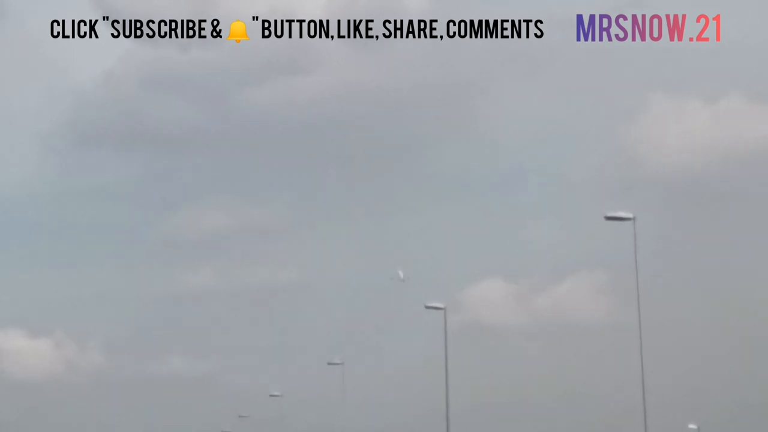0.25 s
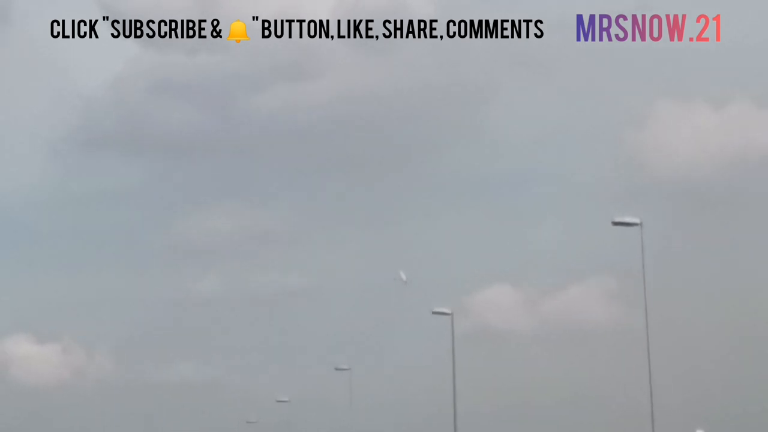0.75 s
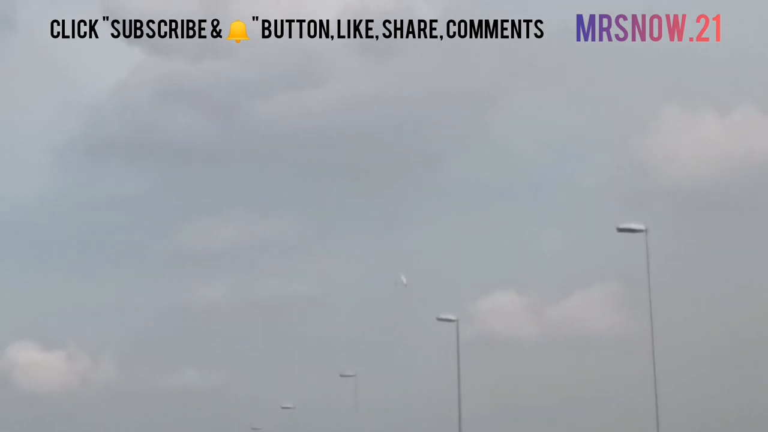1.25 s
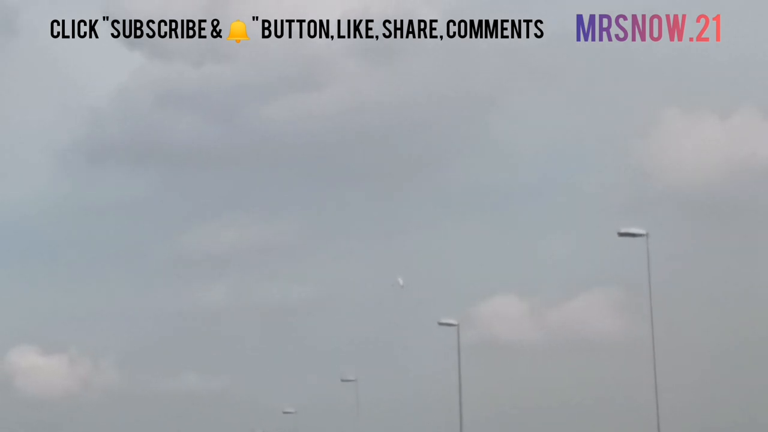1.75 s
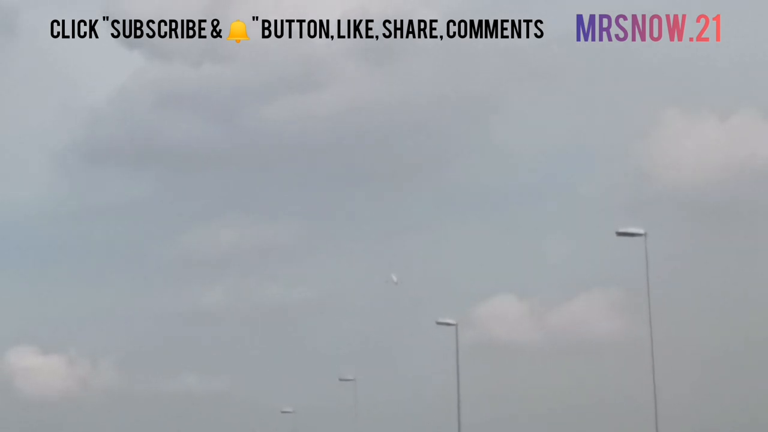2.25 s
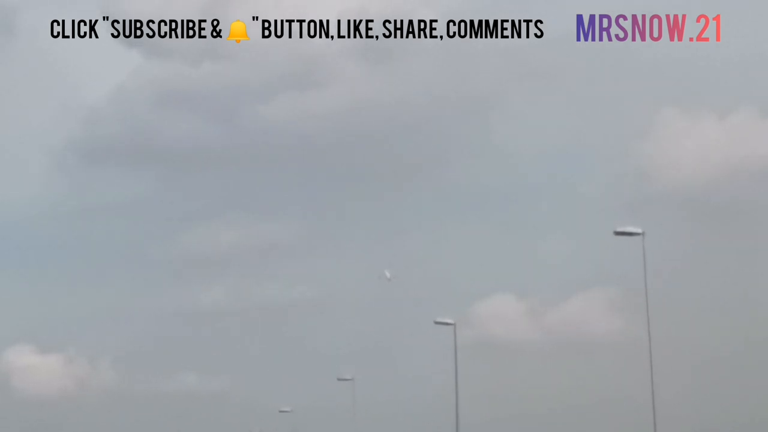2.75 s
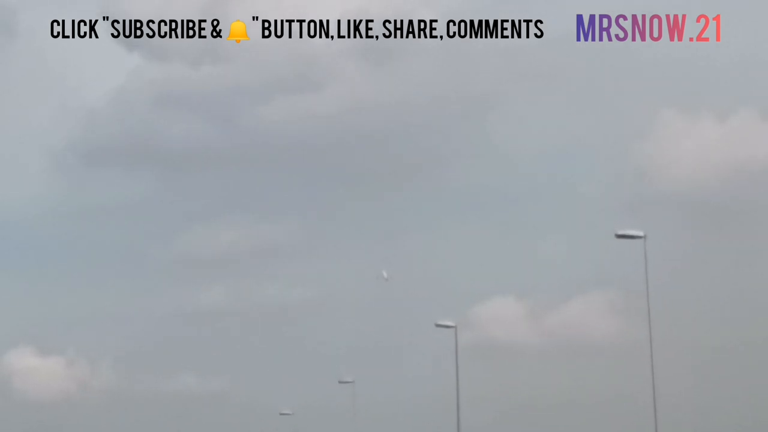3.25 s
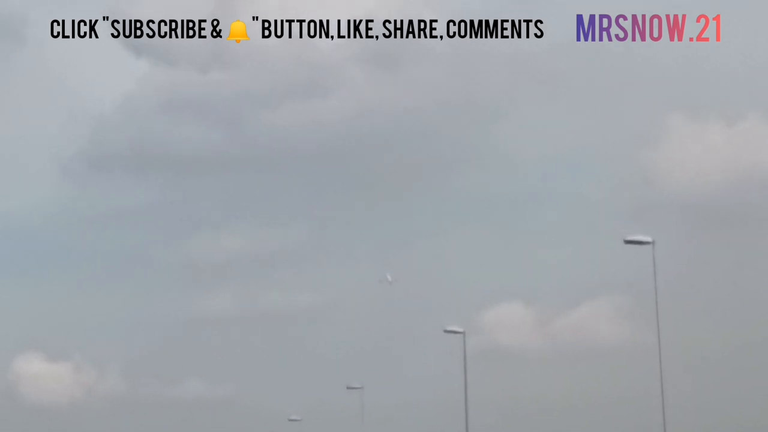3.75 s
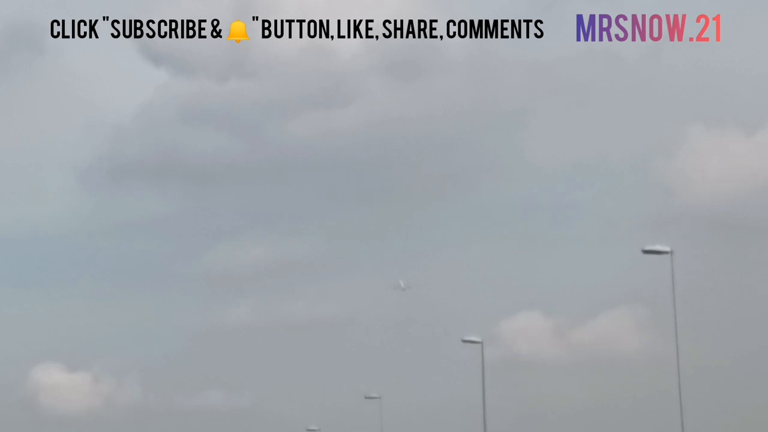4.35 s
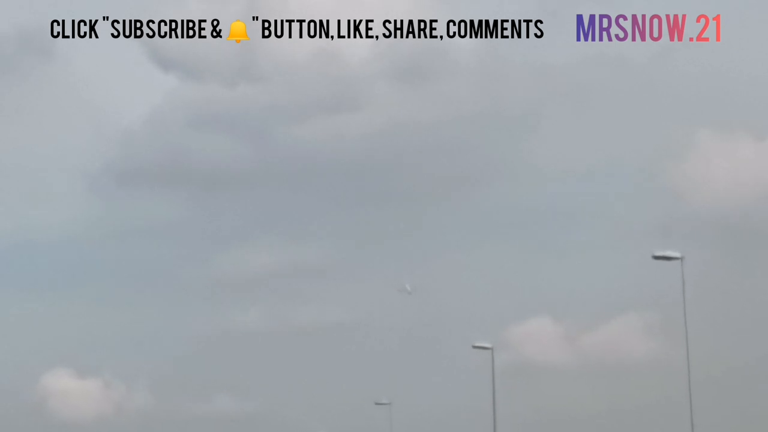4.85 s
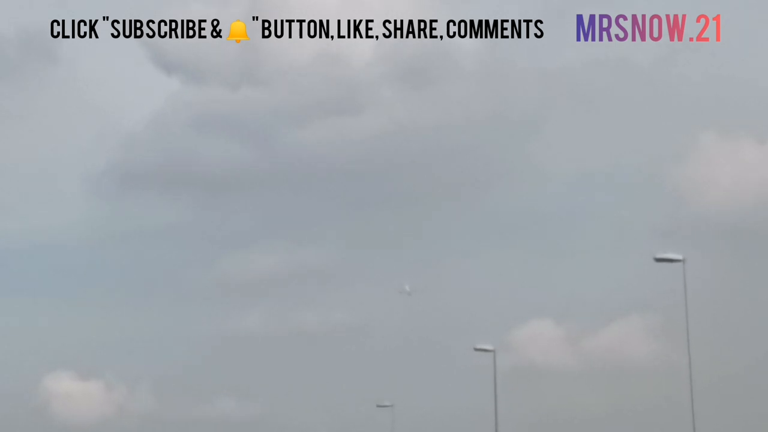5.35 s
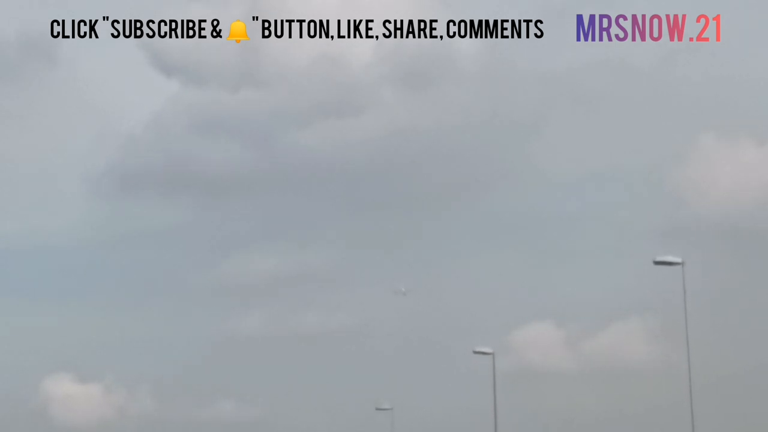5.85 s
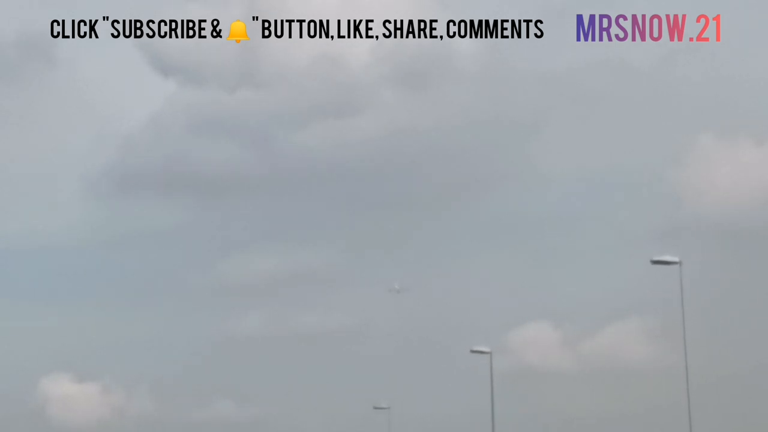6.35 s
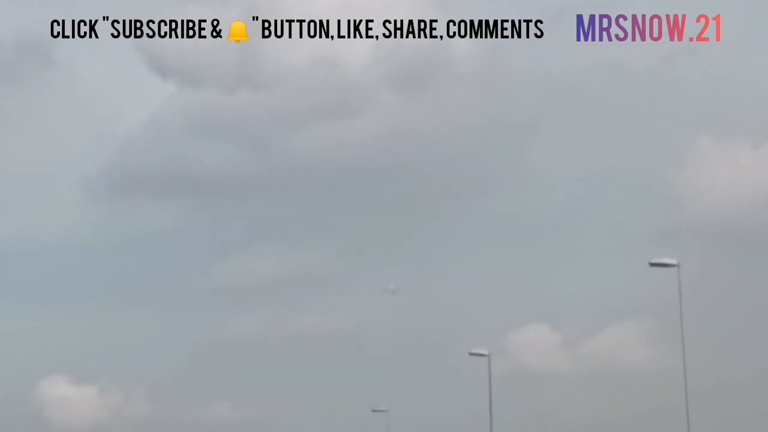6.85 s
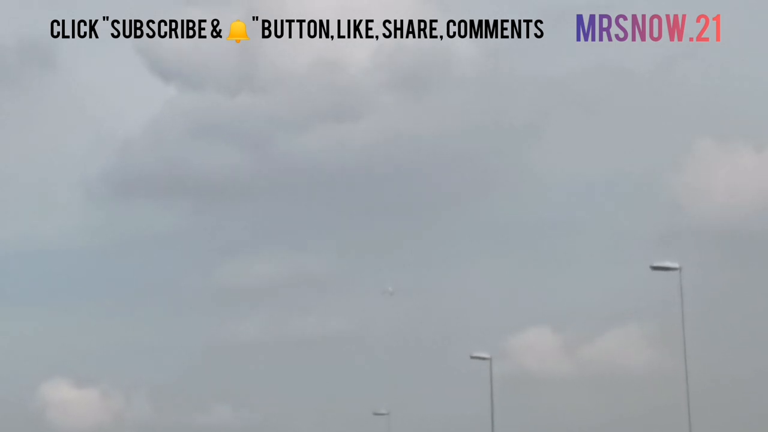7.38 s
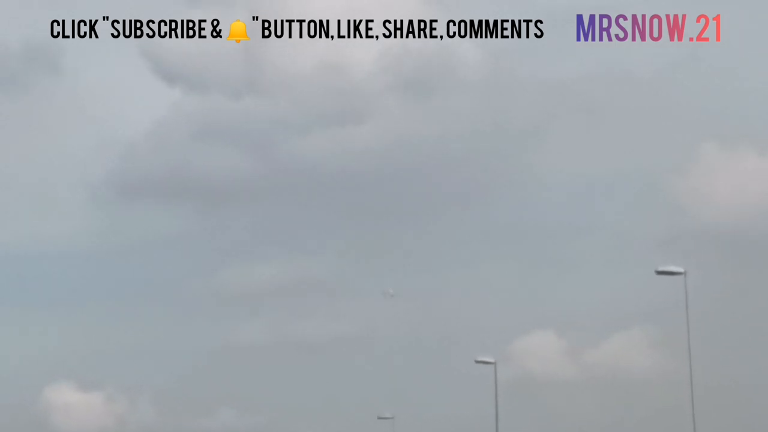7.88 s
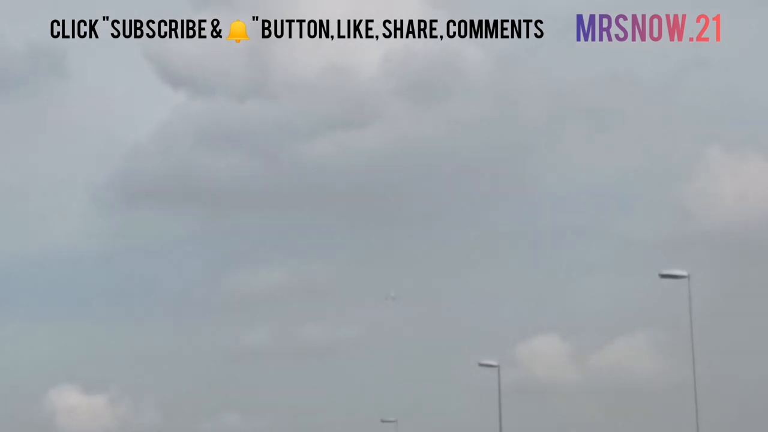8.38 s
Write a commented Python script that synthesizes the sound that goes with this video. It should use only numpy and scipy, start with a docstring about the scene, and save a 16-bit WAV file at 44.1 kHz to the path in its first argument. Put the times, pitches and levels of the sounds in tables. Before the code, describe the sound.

Outdoors under open sky, the bass rumble of a distant departing airliner is the main sound, growing after about two seconds and fading from around six. Nearer the microphone, small birds trade quick rising and falling chirps with brief echoes, ending in a livelier flurry. A single soft tap sounds on the right, while thin insect song, far traffic and leaves form a faint background.

```python
"""A far jet airliner climbs away, its exhaust a dull rumble. From the start small birds whistle short glides,
each thrown back many times by nearby walls; insects sing a high band, mostly on the left, and far traffic
and leaves hiss below. The roar swells from 2 s and holds until near 6 s; something taps once on the right
at 5.3 s. Then the jet fades, and the birds are busiest just before 8 s."""
import sys
import numpy as np
from scipy import signal
from scipy.fft import rfft, irfft, next_fast_len
from scipy.io import wavfile
from scipy.ndimage import uniform_filter1d

SR = 44100
rng = np.random.default_rng(int(sys.argv[2]) if len(sys.argv) > 2 else 0)


def waveform_to_disk(signal):
    """Save audio, clipped to [-1, 1], as 16-bit WAV at the path in sys.argv[1]."""
    frames = np.transpose(np.atleast_2d(signal))
    scaled = np.clip(frames, -1, 1) * 32767
    samples = np.round(scaled).astype(np.int16)
    wavfile.write(sys.argv[1], SR, samples)


N = 380141

# t/s, rumble level/dB, roar level/dB, roar tilt/(dB/octave)
JET_ENVELOPE = [(0, -34.5, -42.5, 4.5), (0.7, -34.5, -43.5, 2), (1.4, -35.5, -39.5, -4),
                (2.1, -33.5, -37.5, -4.5), (2.5, -35, -34.5, 3), (2.9, -35, -31.5, -2.5),
                (3.4, -36, -30.5, 2), (3.9, -34, -34, 3), (4.5, -37.5, -31.5, 0.5), (5.1, -34, -32.5, 0.5),
                (5.6, -35, -32, -2.5), (6.2, -36, -35.5, -3), (7.1, -36.5, -39, -1.5),
                (7.8, -37.5, -42.5, 4), (8.62, -40, -43.5, 2.5)]
# upper edge of the roar: t/s, level/dB
EDGE_ENVELOPE = [(0, -67), (1.6, -66), (2.5, -60.5), (4.2, -60.5), (6, -60), (7.2, -61), (8.62, -63)]
# band shapes: f/Hz, relative density/dB
RUMBLE_SPECTRUM = [(8.8, -56), (15, -9.5), (107, -1), (150, -4), (200, -56), (330, -120)]
ROAR_SPECTRUM = [(71, -32), (120, -2), (167, -1.5), (244, -0.5), (480, -28.5), (620, -48), (1060, -120)]
EDGE_SPECTRUM = [(400, -23), (470, 1.5), (560, -3), (650, -20), (760, -30)]


def jet():
    """Exhaust turbulence; the long path through moving air leaves only the bass and shifts its colour."""
    rumble_db, roar_db, tilt_db_oct = in_time(JET_ENVELOPE)
    edge_db, = in_time(EDGE_ENVELOPE)
    edge = amp(edge_db) * stereo_noise(EDGE_SPECTRUM, flicker_db=0.5)
    rumble = amp(rumble_db) * stereo_noise(RUMBLE_SPECTRUM, flicker_db=1.0)
    roar = amp(roar_db) * stereo_noise(ROAR_SPECTRUM, flicker_db=0.24, tilt_db_oct=tilt_db_oct)
    return rumble + roar + edge


# note contours: t/s, f/Hz, relative level/dB
RISE_CONTOUR = [(0, 3700, -2), (.003, 4070, -2.5), (.009, 4680, -0.5), (.017, 5270, -13), (.026, 5700, -4)]
FALL_CONTOUR = [(0, 3620, -11), (.012, 3570, -2.5), (.022, 3520, 1), (.039, 3020, 5.5), (.054, 2607, -5.5),
                (.076, 2160, -18)]
# t/s, level/dB
RISES = [(.11, -56.5), (0.56, -58.5), (1.026, -58), (1.486, -58), (1.937, -59.5), (2.397, -56.5),
         (2.866, -57), (3.316, -57.5), (3.77, -59.5), (4.233, -64), (4.695, -61.5), (5.158, -60.5),
         (5.642, -63.5), (6.145, -65), (6.612, -65), (7.104, -63)]
# t/s, echo level/dB, direct re echo/dB, walls re echo/dB
FALLS = [(0.278, -59.5, -6, -1), (0.735, -58, -4.5, -4), (1.194, -55, -9, -5), (1.647, -60, -2.5, 0.5),
         (2.108, -57, -7, 0.5), (2.564, -58, -3, 3), (3.029, -58.5, -3, 6), (3.485, -58, -4, 0),
         (3.93, -56.5, -7.5, 0), (4.392, -58.5, -6, 0), (4.862, -63, -5, 3), (5.333, -61, -3, 2),
         (5.815, -60, -1.5, -2), (6.31, -61.5, -2, -5), (6.784, -66.5, 2, -6), (7.272, -63, 0, -7)]


def steady_bird():
    """Alternating rise and fall, left, near the walls; the paths change as the bird turns its head."""
    out = np.zeros((2, N))
    voice = dict(pan_db=14, flutter_db=2.2)
    for start_s, level_db in RISES:
        whistle(out, RISE_CONTOUR, start_s, level_db, echo_db=4, walls_db=-3.5, **voice)
    for start_s, level_db, direct_db, walls_db in FALLS:
        note_db = level_db + direct_db
        whistle(out, FALL_CONTOUR, start_s, note_db, echo_db=-direct_db, walls_db=walls_db, **voice)
    return out


# note contours: t/s, f/Hz, relative level/dB
FLICK_CONTOUR = [(0, 3830, -6.5), (0.013, 4114, 2), (0.026, 4460, 2), (.034, 4460, -8)]
DROP_CONTOUR = [(0, 3236, -3), (.012, 3070, -1.5), (.03, 2700, 4), (.052, 2240, -8.5)]
# flick t/s, drop delay/s, flick level/dB, drop level/dB
ANSWERS = [(-.03, 0.12, -65, -65), (0.4, 0.15, -62, -64.5), (0.846, .148, -56, -61.5),
           (1.28, 0.13, -64, -63.5), (1.705, 0.13, -69, -68.5), (2.139, 0.13, -65, -65),
           (2.553, 0.14, -65, -61.5), (2.987, 0.14, -60.5, -61.5), (3.416, 0.14, -62, -63.5),
           (3.859, 0.13, -64, -63.5), (4.29, 0.14, -64.5, -63.5), (6.365, .151, -62, -63.5),
           (6.797, 0.15, -58.5, -60), (7.222, 0.16, -53.5, -61), (7.66, 0.14, -54, -56),
           (8.096, 0.16, -57, -59), (8.532, 0.25, -54, -59)]


def answering_bird():
    """A flick up, then a drop; the second bout comes from a more open perch, with weaker echoes."""
    out = np.zeros((2, N))
    for start_s, delay_s, flick_db, drop_db in ANSWERS:
        perch_db = -7 if start_s > 5.5 else 0
        whistle(out, FLICK_CONTOUR, start_s, flick_db, pan_db=-1.5, echo_db=perch_db)
        whistle(out, DROP_CONTOUR, start_s + delay_s, drop_db, pan_db=-8.5, echo_db=perch_db + 1)
    return out


# t/s, length/s, start f/Hz, end f/Hz, level/dB, L-R/dB, echo gain/dB
BIRD_GLIDES = [(0.693, 0.02, 3200, 3350, -61, -8, -3), (0.847, 0.023, 2600, 2800, -52.5, -15, -8),
               (0.882, 0.025, 2900, 3500, -57.5, -11, -9), (1.022, 0.025, 4250, 3840, -52.5, 3, -6),
               (1.096, 0.095, 2765, 2500, -65.5, -22, 1.5), (1.201, 0.12, 2650, 2450, -69, -12, -3),
               (1.518, 0.034, 3240, 2810, -59, -14, -4), (1.293, 0.027, 2620, 2140, -62, -8, -12),
               (1.723, 0.04, 4440, 4700, -69, 4, -10), (1.913, 0.033, 3530, 3120, -63.5, -11, 5.5),
               (1.951, 0.017, 3650, 2800, -55, -20, -7), (1.964, 0.017, 2800, 2580, -55, -21, -6),
               (2.883, 0.019, 2800, 2450, -63, -17, -2), (3.126, 0.039, 1920, 1820, -68, -11, -8),
               (2.401, 0.037, 2550, 2860, -63, -15, -5), (2.775, 0.066, 3330, 3290, -65, -8, -12),
               (4.103, 0.059, 2900, 3700, -73, 10, -10), (4.162, 0.025, 3700, 3150, -74, 10, -10),
               (4.189, 0.052, 3230, 3110, -63.5, 0, -14), (4.641, 0.049, 2110, 1895, -65.5, -7, -2),
               (5.596, .016, 2900, 2640, -66, -12, -6), (5.68, 0.07, 2720, 2810, -72, -8, -9),
               (5.753, 0.092, 2820, 2950, -69, -8, -7), (5.912, 0.082, 2800, 3280, -60, 0, -19),
               (6.008, 0.089, 4030, 3700, -67, 11, 0), (6.249, 0.13, 1560, 1426, -72, -4, 4.5),
               (6.957, .045, 3200, 2890, -59, -8, -6), (7.119, 0.0283, 3360, 3870, -62, -1, 4),
               (7.148, 0.027, 3910, 3110, -63.5, -17, 4), (7.185, 0.012, 2720, 2330, -52, -8, -9),
               (7.486, 0.044, 2650, 2580, -64.5, -14, -7), (7.652, 0.02, 3000, 2700, -60, -13, -6),
               (7.668, 0.06, 2800, 2980, -60, -15, -6), (7.747, 0.078, 2850, 2990, -60.5, -3, 1),
               (7.687, .022, 3120, 2080, -56, -16, -5), (7.703, 0.023, 4350, 3750, -54, -3, 0),
               (7.711, 0.036, 2065, 2480, -57, -7, -3), (7.761, 0.051, 4100, 3610, -53.5, -5, -3.5),
               (7.779, 0.046, 3700, 2787, -55, 11, -1.5), (7.81, 0.065, 1950, 1860, -66.5, 1, 0),
               (7.86, 0.05, 2880, 2900, -64, 4, -3), (7.998, 0.045, 2010, 2090, -68, -10, -19)]


def other_birds():
    """Single straight glides through foliage, each swelling to its middle."""
    out = np.zeros((2, N))
    for start_s, length_s, from_hz, to_hz, level_db, pan_db, echo_db in BIRD_GLIDES:
        contour = [(0, from_hz, -6), (length_s / 2, (from_hz + to_hz) / 2, 0), (length_s, to_hz, -6)]
        whistle(out, contour, start_s, level_db, pan_db, echo_db)
    return out


def whistle(out, contour, start_s, level_db, pan_db, echo_db, walls_db=-6, flutter_db=4.5):
    """Add one note to out: a swept sine, fluttering in moving air, heard directly and as echoes."""
    ramp_s, detune, right_lag_s = 0.0019, 0.00605, 0.00055
    t, hz, contour_db = np.transpose(contour)
    age = np.arange(int(t[-1] * SR)) / SR
    ramps = np.minimum(1, np.minimum(age, t[-1] - age) / ramp_s)
    envelope = amp(level_db + np.interp(age, t, contour_db)) * ramps
    pitch_hz = np.interp(age, t, hz) * (1 + rng.normal(0, detune))
    flutter = unit_rms(uniform_filter1d(rng.standard_normal(len(age)), size=100))
    note = envelope * amp(flutter_db * flutter) * np.sin(2 * np.pi * np.cumsum(pitch_hz) / SR)
    paths = amp(echo_db) * echoes(walls_db)
    paths[[0, 1], [0, round(right_lag_s * SR)]] += pan(pan_db)[:, 0]  # direct path
    heard = signal.fftconvolve(note[None], paths, axes=1)
    onset = round(start_s * SR)
    first, last = np.clip([onset, onset + heard.shape[1]], 0, N)
    out[:, first:last] += heard[:, first - onset:last - onset]


# delay/s, left level/dB, right level/dB
WALL_ECHOES = [(0.035, -3.5, 0), (.075, -16, -10)]


def echoes(walls_db):
    """Impulse response: walls, dense leaf scatter, a dying tail; the wind renews it for each note."""
    scatter_db = np.array([[-28.5], [-24]])  # left, right
    build_s = np.array([[0.0038], [0.0088]])
    thin_out_s = np.array([[0.08], [0.17]])
    tail_db, t60_s, smear_s, roughness = -3.5, 0.55, 0.002, 0.6
    age = np.arange(int(0.35 * SR)) / SR
    decay_db = tail_db / (1 + np.exp((thin_out_s - age) / 0.027)) - 60 * age / t60_s
    diffuse = amp(scatter_db + decay_db) * (1 - np.exp(-(age / build_s) ** 2))
    specular = np.zeros((2, len(age)))
    for delay_s, left_db, right_db in WALL_ECHOES:
        gains = amp(walls_db + np.array([left_db, right_db]) + rng.normal(0, 4.0, 2))
        burst = (age >= delay_s) * np.exp(-np.abs(age - delay_s) / smear_s)  # uneven share of the wall
        diffuse += roughness * gains[:, None] * burst / np.sqrt(np.sum(burst ** 2))
        specular[:, round(delay_s * SR)] = np.sqrt(1 - roughness ** 2) * gains
    return diffuse * rng.standard_normal((2, len(age))) + specular


# t/s, pre-filter level/dB
TAPS = [(5.341, -34)]
# f/Hz, relative level/dB, T60/s
TAP_RESONANCES = [(746, 0, 0.0052), (1380, 5.5, 0.0064), (2250, -2, 0.0045)]


def tap():
    """A short dull knock, right channel only; the soft contact rounds its start."""
    out, age = np.zeros(N), np.arange(2000) / SR
    for start_s, level_db in TAPS:
        onset = round(start_s * SR)
        for hz, mode_db, t60_s in TAP_RESONANCES:
            envelope = amp(level_db + mode_db - 60 * age / t60_s)
            out[onset:onset + len(age)] += envelope * np.sin(2 * np.pi * hz * age)
    soft_contact = signal.butter(4, [400, 2300], "band", fs=SR, output="sos")
    return signal.sosfilt(soft_contact, out) * [[0], [1]]


# f/Hz, nominal width/Hz, pre-pan level/dB, L-R/dB
INSECT_BANDS = [(7800, 280, -99, 43), (9130, 510, -76, 19.5), (10920, 570, -111.5, -65.5)]


def insects():
    """Many singers blur into noise, filtered twice by their wing resonance."""
    out = 0
    for hz, width_hz, level_db, pan_db in INSECT_BANDS:
        radius = np.exp(-np.pi * width_hz * 1.5 / SR)
        wing = [1, 0, -1, 1, -2 * radius * np.cos(2 * np.pi * hz / SR), radius ** 2]
        chorus = unit_rms(signal.sosfilt([wing, wing], rng.standard_normal((2, N))))
        out += amp(level_db + 0.56 * drift(rate_hz=7)) * pan(pan_db) * chorus
    return out


# t/s, traffic level/dB, leaves level/dB
BACKGROUND_ENVELOPE = [(0, -52, -60), (0.5, -53, -63.5), (2.0, -52, -64), (2.4, -51.5, -63),
                       (3.6, -54, -64.5), (5.0, -55.5, -64.3), (6.4, -54, -63.5), (7.3, -56, -62),
                       (8.62, -58, -62)]
# f/Hz, relative density/dB
TRAFFIC_SPECTRUM = [(220, -19), (380, -0.5), (452, -4), (540, -20), (629, -16), (890, -12.5), (1220, -25.5),
                    (2120, -33), (2300, -32.5), (2990, -46), (5060, -120)]
LEAVES_SPECTRUM = [(1000, -10), (1700, -4.5), (2140, -7.5), (3010, -2), (3730, -5.5), (4740, 3), (5590, 1),
                   (6250, -4.5), (8320, -9.5), (10200, -18), (11100, -25), (12200, -22), (14400, -28),
                   (14700, -27), (15700, -35)]


def traffic_and_leaves():
    """Far tyres and engines, and leaves in a light wind."""
    traffic_db, leaves_db = in_time(BACKGROUND_ENVELOPE)
    traffic = amp(traffic_db) * stereo_noise(TRAFFIC_SPECTRUM, flicker_db=1.5)
    leaves = amp(leaves_db) * stereo_noise(LEAVES_SPECTRUM, flicker_db=1.5)
    return traffic + leaves


# f/Hz, L-R correlation
STEREO_CORRELATION = [(30, 1), (60, 1), (140, 1), (330, 0.99), (500, 0.9), (800, 0.77), (1000, 0.61),
                      (1250, 0.48), (1600, -0.17), (2000, -0.29), (2700, 0.19), (4200, -0.25), (6400, 0.29),
                      (9800, -0.29), (15000, 0.31)]
# f/Hz, L-R/dB
STEREO_BALANCE = [(60, -0.75), (200, -1.53), (330, -0.5), (770, -2), (1800, -2.5), (4200, -8.5),
                  (7000, 1.5), (15000, -2)]


def stereo_noise(spectrum, flicker_db, tilt_db_oct=0, pivot_hz=208):
    """Shaped, partly correlated noise; rms 1 before each half octave gets its own flicker and tilt."""
    size = next_fast_len(N)
    hz = np.maximum(np.fft.rfftfreq(size, 1 / SR), 1)
    low_hz, high_hz = spectrum[0][0], spectrum[-1][0]
    shape = amp(at_hz(spectrum, hz)) * ((hz > low_hz) & (hz < high_hz))
    mid, side = rfft(rng.standard_normal((2, size))) * shape
    correlation = at_hz(STEREO_CORRELATION, hz)
    pair = np.sqrt(1 + correlation) * mid + np.sqrt(1 - correlation) * side * [[1], [-1]]
    pair *= pan(at_hz(STEREO_BALANCE, hz))
    rms = np.sqrt(np.mean(irfft(pair, size) ** 2))
    out = 0
    for centre_hz in low_hz * 2 ** np.arange(0, np.log2(high_hz / low_hz) + 0.5, 0.5):
        band = np.clip(1 - 2 * np.abs(np.log2(hz / centre_hz)), 0, 1)
        gain_db = flicker_db * drift(rate_hz=15) + tilt_db_oct * np.log2(centre_hz / pivot_hz)
        out += amp(gain_db) * irfft(pair * band, size)[:, :N]
    return out / rms


def drift(rate_hz):
    """Slow random wander, rms 1."""
    hop, settle = 40, 2000
    pole = np.exp(-2 * np.pi * rate_hz * hop / SR)
    noise = rng.standard_normal(N // hop + settle + 2)
    slow = signal.lfilter([1], [1, -2 * pole, pole ** 2], noise)[settle:]
    return np.interp(np.arange(N) / hop, np.arange(len(slow)), unit_rms(slow))


def amp(db):
    return 10 ** (np.asarray(db) / 20)


def unit_rms(x):
    return x / np.sqrt(np.mean(x ** 2) + 1e-20)


def pan(left_minus_right_db):
    return amp(np.array([[0.5], [-0.5]]) * left_minus_right_db)


def in_time(rows):
    t, *columns = np.transpose(rows)
    return [np.interp(np.arange(N) / SR, t, column) for column in columns]


def at_hz(rows, hz):
    knots_hz, values = np.transpose(rows)
    return np.interp(np.log(hz), np.log(knots_hz), values)


def scene():
    return jet() + traffic_and_leaves() + insects() + steady_bird() + answering_bird() + other_birds() + tap()


def record(dry):
    """Brief fades at both ends, then a steep low-pass."""
    fade_s, stop_hz = 0.004, 15900
    fade = np.minimum(1, np.minimum(np.arange(N), np.arange(N)[::-1]) / (fade_s * SR))
    lowpass = signal.cheby2(20, 60, stop_hz, fs=SR, output="sos")
    return signal.sosfilt(lowpass, dry * fade)


dry = scene()
out = record(dry)
waveform_to_disk(out)
```